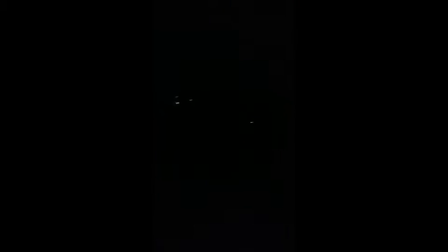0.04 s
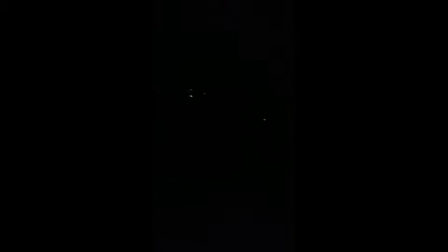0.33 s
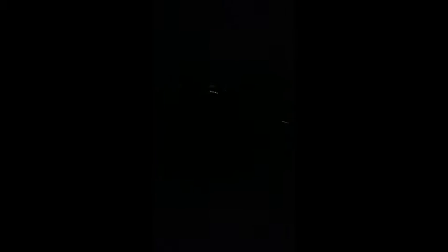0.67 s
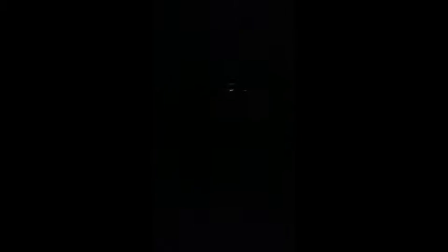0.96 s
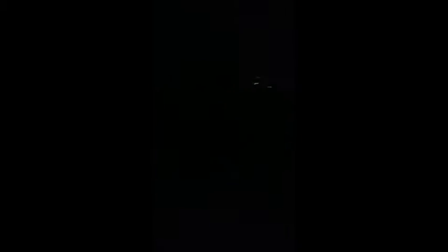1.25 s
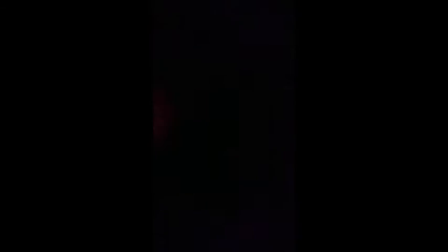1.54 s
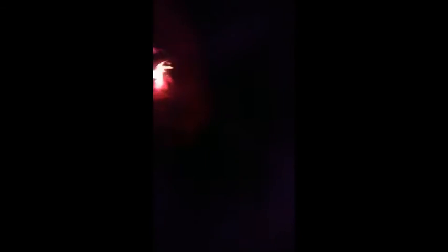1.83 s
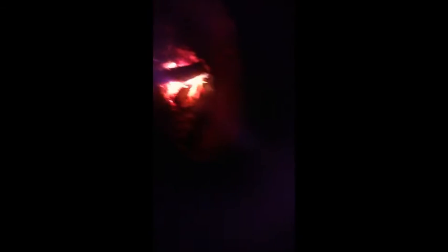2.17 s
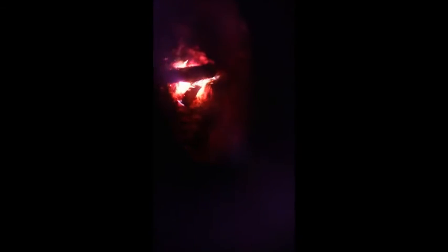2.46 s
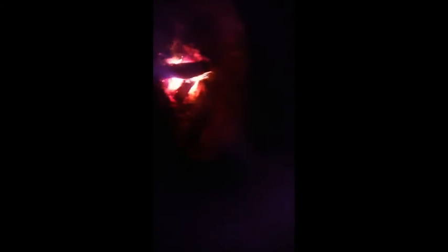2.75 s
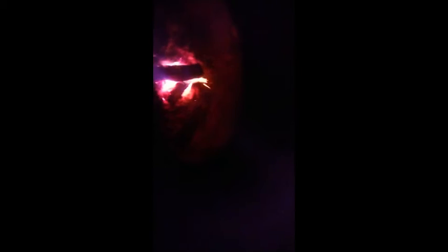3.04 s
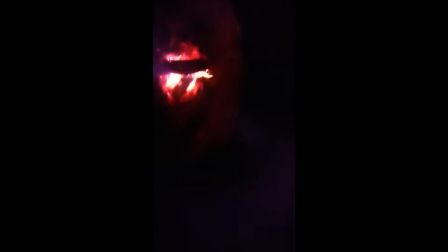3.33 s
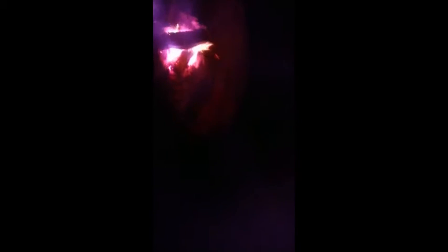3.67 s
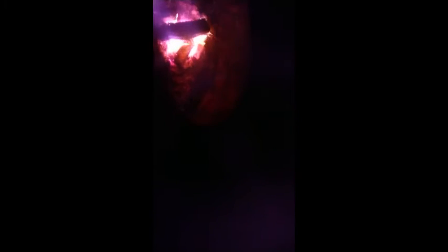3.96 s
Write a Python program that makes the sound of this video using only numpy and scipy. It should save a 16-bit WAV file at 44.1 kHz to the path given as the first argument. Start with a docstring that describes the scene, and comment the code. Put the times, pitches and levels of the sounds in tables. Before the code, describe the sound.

Trembling loon calls come in three runs, echoing off a wooded shore. Beneath them are quiet night insects and sparse dry campfire pops, with a few close finger taps and rubs on the right of the microphone.

```python
"""Loons give tremolo calls, wavering near-pure tones that echo off a wooded lake shore at night.
Two crickets chirp with their wings over a steady insect chorus; a campfire ticks now and then.
Fingers rub and tap the recorder's casing close to its right microphone."""
import sys
import numpy as np
from scipy import signal
from scipy.fft import rfft, irfft
from scipy.io import wavfile

SR = 44100
rng = np.random.default_rng(int(sys.argv[2]) if len(sys.argv) > 2 else 0)


def dump(signal):
    """Clip the signal to [-1, 1] and save it as 16-bit WAV at the path in sys.argv[1]."""
    limited = np.clip(np.atleast_2d(signal).T, -1, 1)
    pcm = np.round(limited * 32767).astype(np.int16)
    wavfile.write(sys.argv[1], SR, pcm)


N = 176400
T = np.arange(N) / SR


def from_db(db):
    """Decibels to gain."""
    return 10 ** (np.asarray(db) / 20)


def unit_rms(x):
    """Scale to rms 1."""
    return x / np.sqrt(np.mean(x ** 2) + 1e-20)


def pan(db):
    """Stereo gains for a left-minus-right level, mean power 1."""
    return unit_rms(from_db([[db / 2], [-db / 2]]))


def drift(rate_hz, size=N):
    """Slow random wander, rms 1."""
    pole = np.exp(-80 * np.pi * rate_hz / SR)
    slow = signal.lfilter([1], [1, -2 * pole, pole * pole], rng.standard_normal(size // 40 + 2002))
    return np.interp(np.arange(size) / 40, np.arange(len(slow) - 2000), unit_rms(slow[2000:]))


def bin_gains(spectrum):
    """FFT bin gains from (frequency [Hz], level [dB]) points."""
    hz, db = np.transpose(spectrum)
    return from_db(np.interp(np.log(np.fft.rfftfreq(N, 1 / SR) + 1), np.log(hz), db))


def noise(spectrum):
    """Uncorrelated stereo coloured noise, rms 1."""
    return unit_rms(irfft(rfft(rng.standard_normal((2, N))) * bin_gains(spectrum), N))


def swells(rows):
    """Sum of Gaussian envelopes."""
    return sum(from_db(db) * np.exp(-.5 * ((T - s) / sigma) ** 2) for s, sigma, db in rows)


def bursts(rows, decay_s):
    """Sudden, decaying envelopes, each peaking at half its row's gain."""
    return sum(from_db(db) * (T >= s) * np.exp(-np.abs(T - s) / decay_s) / 2 for s, db in rows)


def click(time_s, cutoff_hz):
    """A contact: one low-passed impulse."""
    impulse = np.zeros(N)
    impulse[int(time_s * SR)] = 1
    pole = np.exp(-2 * np.pi * cutoff_hz / SR)
    return signal.lfilter([1 - pole], [1, -pole], impulse + 1e-18)


def ring(x, hz, t60_s):
    """One damped mode driven by x."""
    r, w = np.exp(-np.log(1000) / (t60_s * SR)), 2 * np.pi * hz / SR
    return signal.lfilter([0, np.sin(w)], [1, -2 * r * np.cos(w), r * r], x + 1e-18)


def knock(spectrum):
    """Minimum-phase impulse response of a spectrum, peak 1."""
    cepstrum = irfft(np.log(bin_gains(spectrum)), N)[:N // 2]
    response = irfft(np.exp(rfft(2 * cepstrum, N)), N)[:SR // 20]
    return -response / np.abs(response).max()


def echoes(x, delay_s, t60_s):
    """Dense decaying reflections from the trees, different at each microphone."""
    response = rng.standard_normal((2, N)) * (T > delay_s) * np.exp(-np.log(1000) * T / t60_s)
    response /= np.sqrt(np.sum(response ** 2, axis=1, keepdims=True))
    return signal.fftconvolve(x[None], response, axes=1)[:, :len(x)]


# Air spectrum (frequency [Hz], level [dB])
AIR_SPECTRUM = [(25, -27), (60, -1.5), (100, 0.5), (200, -9), (400, -17), (800, -9.5), (1200, -9),
                (2000, -24.5), (3500, -28), (6500, -33.5), (8200, -51.5), (10300, -30), (13000, -47),
                (16000, -44.5)]


def night_air():
    """Quiet low noise, wandering in level."""
    return noise(AIR_SPECTRUM) * from_db(-72 + 3.2 * drift(rate_hz=6)) * pan(db=-3.5)


# Chorus and buzz spectra (frequency [Hz], level [dB])
CHORUS_SPECTRUM = [(3000, -52.5), (4200, -18.5), (4700, -4), (5300, 4.5), (5750, 2.5), (6200, -34),
                   (7200, -37), (9000, -51)]
BUZZ_SPECTRUM = [(6000, -28.5), (9500, -1.5), (12000, -3), (14500, 12), (16000, 6.5)]
# Buzzes (centre [s], sigma [s], level [dB])
BUZZES = [(.42, 0.13, -76.5), (1.28, 0.047, -84), (1.6, 0.03, -79), (1.88, 0.096, -85), (2.17, .1, -76),
          (2.54, 0.057, -78.5), (2.83, 0.05, -76.5), (3.27, 0.089, -81), (3.7, .15, -88), (4.0, 0.053, -99)]


def insects():
    """A steady chorus and brief, very high buzzes."""
    chorus = noise(CHORUS_SPECTRUM) * from_db(-71 + 1.8 * drift(rate_hz=13)) * pan(db=-10)
    return chorus + noise(BUZZ_SPECTRUM) * swells(BUZZES) * pan(db=1)


# Last wing stroke of each chirp (time [s], level [dB])
NEAR_CHIRPS = [(.572, -63), (1.287, -61.5), (1.915, -68), (2.572, -63), (3.228, -59), (3.985, -60.5)]
FAR_CHIRPS = [(.28, -64.5), (.9, -62), (1.59, -71), (2.25, -69), (2.9, -72.5), (3.62, -73)]
STROKE_GAP_S, STROKE_SIGMA_S, STROKE_GROWTH_DB = .042, .007, 2.5


def cricket(chirps, hz, drop_hz, wet_db):
    """Four wing strokes a chirp, each louder than the one before and falling in pitch as it ends."""
    song = np.zeros(N)
    for last_s, db in chirps:
        for k in range(4):  # counted back from the last stroke
            u = (T - last_s + k * STROKE_GAP_S) / STROKE_SIGMA_S
            on = np.abs(u) < 4
            pitch_hz = hz * (1 - .018 * k) - drop_hz * np.maximum(u[on], 0) ** 2
            envelope = from_db(db - STROKE_GROWTH_DB * k) * np.exp(-.5 * u[on] ** 2)
            song[on] += envelope * np.sqrt(2) * np.sin(2 * np.pi * np.cumsum(pitch_hz) / SR)
    return song + from_db(wet_db) * echoes(song, delay_s=.005, t60_s=.5)


# Tick and hiss spectra (frequency [Hz], level [dB])
TICK_SPECTRUM = [(100, -11.5), (500, 0.5), (1200, 14.5), (3000, -4), (5500, -2), (8000, -35.5),
                 (11000, -31), (16000, -32.5)]
HISS_SPECTRUM = [(300, 4.5), (1500, 2), (4000, -11.5), (6000, -5.5), (9000, -12.5), (12000, -37),
                 (16000, -25)]
# Fire ticks (time [s], level [dB])
TICKS = [(0.712, -41.5), (1.009, -76), (1.288, -51), (1.309, -71), (2.069, -48.5), (2.485, -44.5),
         (2.719, -37), (2.882, -51), (3.22, -45)]


def campfire():
    """Short dry ticks and one soft hiss."""
    ticks = noise(TICK_SPECTRUM) * bursts(TICKS, decay_s=.0024) * pan(db=-2.5)
    hiss = noise(HISS_SPECTRUM) * swells([(2.14, .064, -63)]) * pan(db=2.5)
    return ticks + hiss


# Sliding-skin spectra (frequency [Hz], level [dB])
SWISH_SPECTRUM = [(4000, -33), (6000, -6.5), (8200, -16), (10200, 8), (12000, 3), (13500, -1.5),
                  (16000, 5.5)]
RASP_SPECTRUM = [(60, -14.5), (400, -7), (1100, 9.5), (2500, -5), (4200, -3), (5600, 6.5), (6600, -16),
                 (8200, -34), (16000, -27.5)]
# Finger slides (centre [s], sigma [s], swish [dB], rasp [dB])
RUBS = [(0.564, 0.043, -68.5, -71.5), (.8, 0.067, -62.5, -63.5), (1.011, 0.029, -45, -44.5),
        (3.388, 0.0052, -64, -40.5), (3.503, 0.023, -62.5, -52.5), (3.573, 0.2, -78.5, -68.5),
        (3.762, 0.032, -71.5, -62), (3.92, .1, -79.5, -70.5)]
# Skin catches (time [s], level [dB])
SNAPS = [(.541, -55), (.568, -45.5), (.619, -47), (.679, -50), (.865, -41), (3.3939, -33), (3.4025, -45),
         (3.4298, -52.5), (3.605, -51)]
FINGER_PAN_DB = -35


def finger_rubs():
    """Skin slides on the casing in grainy swishes and catches in tiny bright snaps."""
    grain = from_db(.5 * drift(rate_hz=160))
    slides = grain * swells((s, sigma, db) for s, sigma, db, _ in RUBS)
    swish = noise(SWISH_SPECTRUM) * (slides + bursts(SNAPS, decay_s=.0015))
    rasp = noise(RASP_SPECTRUM) * grain * swells((s, sigma, db) for s, sigma, _, db in RUBS)
    return (swish + rasp) * pan(FINGER_PAN_DB)


# Grip spectrum (frequency [Hz], level [dB])
BUMP_SPECTRUM = [(25, -34.5), (65, -0.5), (120, -5), (250, -16), (700, -20), (2000, -47.5), (6000, -71.5)]
# Grip bumps (centre [s], sigma [s], level [dB])
BUMPS = [(.72, 0.032, -63.5), (1.04, 0.017, -57), (1.295, 0.018, -62), (2.265, 0.011, -61),
         (2.44, 0.018, -72), (2.73, .015, -63.5), (3.68, 0.063, -51), (3.85, 0.12, -63)]


def grip_bumps():
    """Low bumps from the hand's grip."""
    return noise(BUMP_SPECTRUM) * swells(BUMPS) * pan(db=-14.5)


# Casing response (frequency [Hz], level [dB])
CASING_SPECTRUM = [(30, -6), (180, -26), (330, -11), (550, -2.5), (700, -2.5), (830, 2), (1300, -2),
                   (2200, -10.5), (4600, -22.5), (5300, -18.5), (5700, -16), (6200, -29), (8500, -46),
                   (10300, -44), (16000, -40.5)]
# Taps (time [s], click drive [dB], thump drive [dB])
TAPS = [(1.0904, -4, -30), (3.3936, -21, -30.5), (3.454, -29, -52), (3.606, -39, -72), (3.650, -44, -49),
        (3.670, -38, -51), (3.716, -39.5, -55.5), (3.897, -39.5, -77)]


def finger_taps():
    """Taps ring the casing briefly and thump the microphone."""
    contacts = sum(from_db(db) * click(s, cutoff_hz=14000) for s, db, _ in TAPS)
    casing = signal.fftconvolve(contacts, knock(CASING_SPECTRUM))[:N]
    pushes = sum(from_db(db) * click(s, cutoff_hz=70) for s, _, db in TAPS)
    highpass = signal.butter(2, 58, "high", fs=SR, output="sos")
    thumps = signal.sosfilt(highpass, ring(pushes, hz=66, t60_s=.092))
    return casing * pan(FINGER_PAN_DB) + thumps * pan(db=-25)


# Cry spectrum (frequency [Hz], level [dB])
CRY_SPECTRUM = [(1200, -42), (1700, 7.5), (1950, 9.5), (2200, -6), (2700, -38)]
# Cry envelope (centre [s], sigma [s], level [dB])
CRY_SWELL = [(1.93, .12, -75.5)]


def distant_cry():
    """One faint swell of narrow-band noise."""
    return noise(CRY_SPECTRUM) * swells(CRY_SWELL) * pan(db=-16.5)


# Recorder turning toward the fire (time [s], left microphone lag [ms], early echo send [dB])
TURN = [(0, -0.068, 3), (1.199, -0.1, -2), (2.1, 0.34, -6.5), (2.701, 0.32, -2.5), (3.0, 0.3, -4),
        (3.8, 0.24, -1)]
# Single echoes off the nearest trees (delay [s], level [dB], left minus right [dB])
SLAPS = [(.048, -19, -3), (.073, -12.5, -4.5)]
EARLY_DB, TAIL_DB = -11, -19.5
LOON_TIME_S = np.arange(-SR // 2, N) / SR  # 0.5 s pre-roll


def across_lake(voice):
    """A call arrives directly, then off the near trees and the far shore."""
    t = LOON_TIME_S
    turn_s, lag_ms, send_db = np.transpose(TURN)
    lag_s = np.interp(t, turn_s, lag_ms) / 1000
    direct = np.array([np.interp(t - lag_s, t, voice), voice]) * pan(db=-5.5)
    send = voice * from_db(np.interp(t, turn_s, send_db))
    trees = from_db(EARLY_DB) * echoes(send, delay_s=.03, t60_s=.93)
    shore = from_db(TAIL_DB) * echoes(voice, delay_s=.12, t60_s=4.3)
    slaps = sum(from_db(db) * pan(side_db) * np.interp(t - delay_s, t, send)
                for delay_s, db, side_db in SLAPS)
    return (direct + slaps + pan(db=-4.5) * (trees + shore))[:, -N:]


# Loon notes (start [s], end [s], crest time [s], waver rate [Hz], trough pitch [Hz], crest pitch [Hz],
# sag [Hz/s], level [dB], trough dip [dB], harmonic 2 [dB], harmonics 3-4 [dB])
LOON_NOTES = [(-.02, 0.05, .03, 7.5, 1035, 1121, -17.5, -36, -11.5, -22, -38),
              (.088, 0.267, .135, 9.2, 1088, 1325, 207.5, -33, 21.5, -35, -50.5),
              (.275, 0.412, .35, 9.62, 1080, 1239, 1, -39.5, 11, -38, -48.5),
              (.407, 0.432, .40, 7.1, 762, 894, -8, -54.5, 4.5, -56.5, -42.5),
              (0.583, 0.633, .625, 7.7, 659.5, 787, -0.5, -53, -4.5, 0.5, -34),
              (.638, 1.108, 0.79, 10.36, 972, 1218, 25.5, -38, 5.5, -33, -35.5),
              (1.12, 1.255, 1.19, 9.97, 951, 1165, 5, -43.5, 3.5, -34, -30),
              (1.263, 1.3, 1.27, 5.4, 554, 611, -0.5, -70.5, 17, -17.5, -23),
              (2.112, 2.162, 2.172, 7.1, 586, 833, 1, -57, 18.5, 11.5, -32.5),
              (2.17, 2.703, 2.252, 10.36, 962.8, 1200, 15.5, -37, 15.5, -35, -40),
              (2.532, 2.607, 2.555, 5.5, 547, 655, 13, -62.5, 3.5, -7, -27),
              (2.617, 2.658, 2.665, 9, 598, 786, -10, -57, 7, 8.5, -24),
              (2.659, 2.808, 2.768, 8.1, 922, 1129, -12.5, -35.5, 30.5, -24, -40),
              (2.83, 3.044, 2.875, 9.5, 1097, 1326, 210, -40, 9, -43, -54.5),
              (2.807, 2.858, 2.80, 5, 536, 632, -0.5, -69, 1, -15.5, -26),
              (3.059, 3.173, 3.10, 8.67, 869, 1028, -5.5, -45.5, 28.5, -14.5, -40),
              (3.626, 3.687, 3.66, 6.2, 642, 746.5, 7.5, -53, 6, -3, -30),
              (3.7, 4.042, 3.738, 10.04, 935, 1198, 12.5, -39, 27.5, -29.5, -38)]
# Colour of harmonics 3-4 (frequency [Hz], level [dB])
OVERTONE_SPECTRUM = [(2700, -26.5), (3100, -5), (3380, 2.5), (3650, -11), (4200, -9), (4800, 9),
                     (5300, -6.5)]
CREST_SHAPE, NOTE_EDGE_S, PITCH_JITTER = 1.25, .014, .0084
BREAK_SHARPNESS = 2.72  # higher: narrower break in each trough


def loons():
    """Near-pure tones waver in arches, most loudest on the crests; low lead-ins have a strong octave."""
    t = LOON_TIME_S
    voice = np.zeros(len(t))
    wobble = 1 + PITCH_JITTER * drift(rate_hz=80, size=len(t))
    for start, end, crest, rate_hz, low_hz, high_hz, sag, db, dip_db, octave_db, upper_db in LOON_NOTES:
        on = (t > start - NOTE_EDGE_S / 2) & (t < end + NOTE_EDGE_S / 2)
        from_crest_s = t[on] - crest
        arch = np.abs(np.cos(np.pi * rate_hz * from_crest_s)) ** CREST_SHAPE
        pitch_hz = (low_hz + (high_hz - low_hz) * arch - sag * from_crest_s) * wobble[on]
        phase = 2 * np.pi * np.cumsum(pitch_hz) / SR
        tone = np.sin(phase) + from_db(octave_db) * np.sin(2 * phase)
        for k in (3, 4):
            colour_db = np.interp(k * pitch_hz, *np.transpose(OVERTONE_SPECTRUM))
            tone += from_db(upper_db + colour_db) * np.sin(k * phase)
        inside_s = np.minimum(t[on] - start, end - t[on])
        gate = np.sin(np.pi / 2 * np.clip(inside_s / NOTE_EDGE_S + .5, 0, 1)) ** 2
        level_db = db - dip_db * (1 - arch) ** BREAK_SHARPNESS
        voice[on] += np.sqrt(2) * from_db(level_db) * gate * tone
    return voice


def scene():
    """All sources over the night air."""
    air = night_air()
    calls = across_lake(loons()) + distant_cry()
    near_cricket = cricket(NEAR_CHIRPS, hz=5070, drop_hz=152, wet_db=-2) * pan(db=-5)
    far_cricket = cricket(FAR_CHIRPS, hz=5200, drop_hz=30, wet_db=-5) * pan(db=8)
    background = air + insects() + near_cricket + far_cricket
    handling = finger_rubs() + grip_bumps() + finger_taps()
    return background + campfire() + handling + calls


def record(dry):
    """Steep low-pass at 15.9 kHz."""
    return signal.sosfilt(signal.ellip(10, .1, 80, 15900, fs=SR, output="sos"), dry)


dry = scene()
out = record(dry)
dump(out)
```